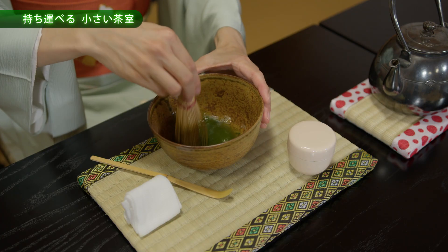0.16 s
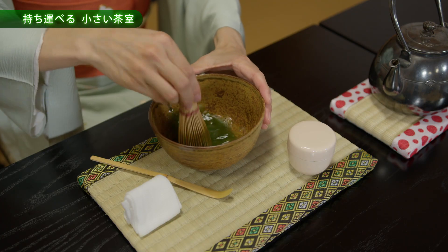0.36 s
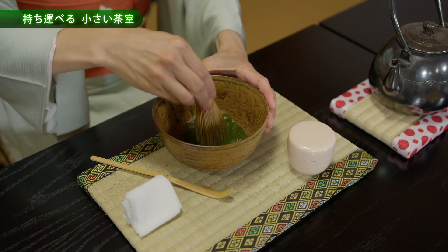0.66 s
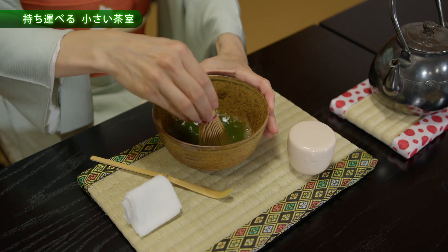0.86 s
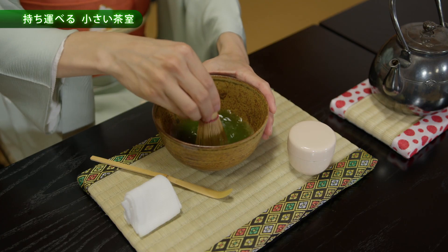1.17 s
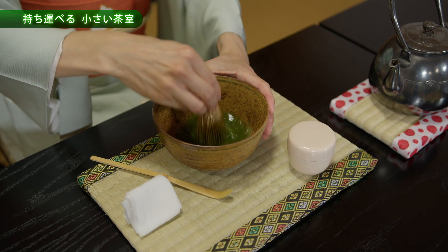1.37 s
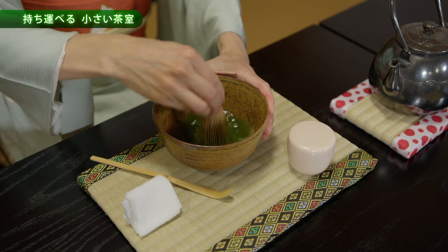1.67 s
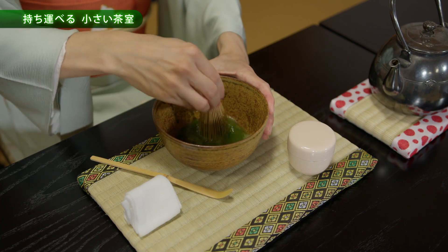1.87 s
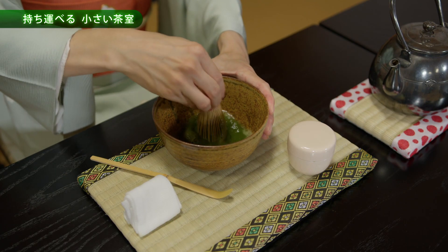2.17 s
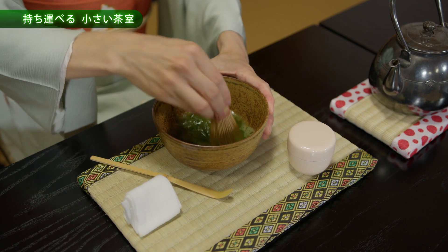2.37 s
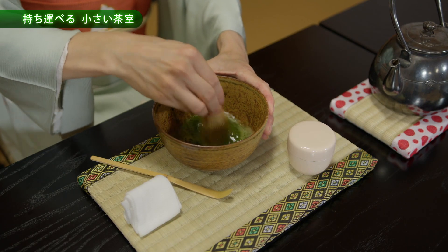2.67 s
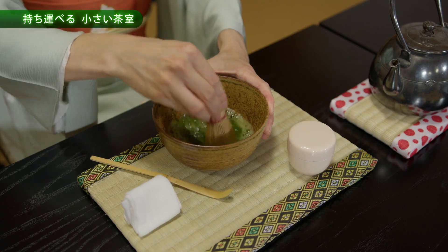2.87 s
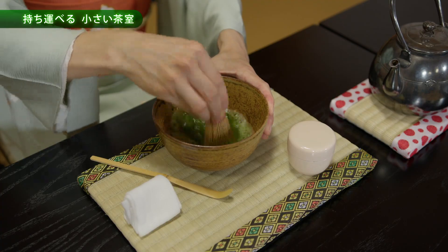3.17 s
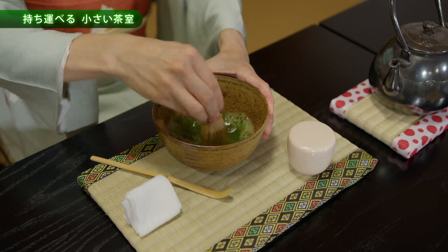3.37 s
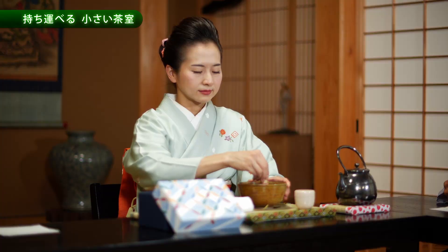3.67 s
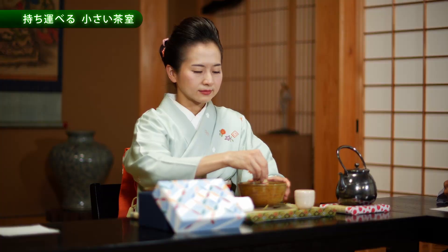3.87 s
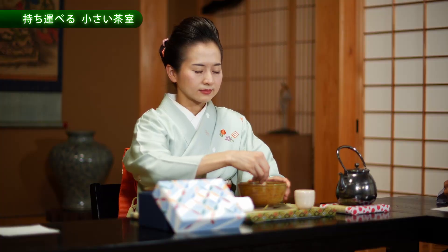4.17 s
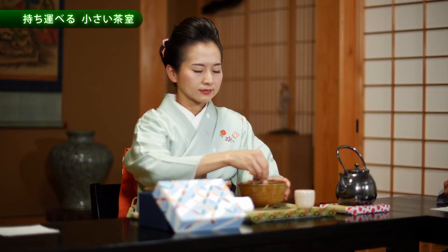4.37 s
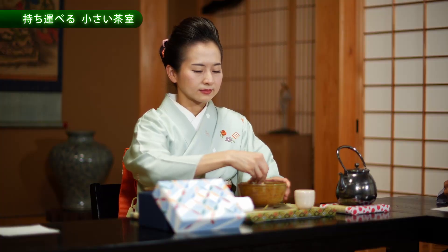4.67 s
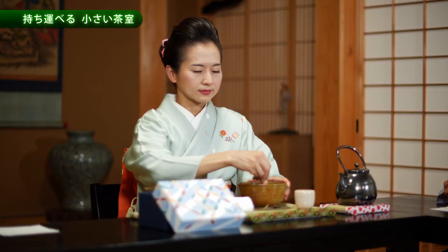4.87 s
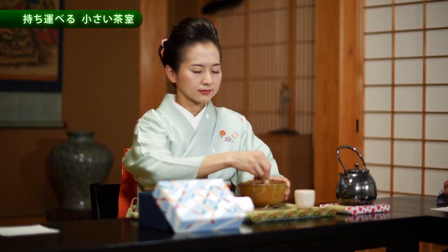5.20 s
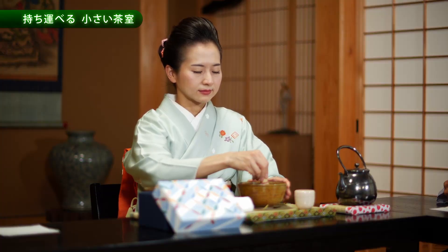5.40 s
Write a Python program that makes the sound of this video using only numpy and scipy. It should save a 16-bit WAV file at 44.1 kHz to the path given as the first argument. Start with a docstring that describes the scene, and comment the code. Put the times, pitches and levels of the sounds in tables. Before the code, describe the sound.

Near microphone, soft short indoor echo, faint air and hum. Thin bamboo tines rub and scratch a glazed bowl in quick regular strokes, each with a small splash and fine bubbles. The bowl taps its mat near the start; strokes are strongest around one second, then settle into even, frothy whisking with tiny squeaks, pops and faint table thuds.

```python
"""Close by a ceramic bowl of tea in a small quiet room: soft air with a faint hum, froth fizzing, a whisk rubbing.
About six strokes a second: a wave of fine bubbles, a scratch that rings the glaze, a splash, a soft swing back.
Early on the bowl knocks and scuffs on its mat and the table thuds, as it will now and then; bubbles pop, tea gulps.
Then come brief narrow tones, tines squeaking and bubbles sinking in pitch; some tines snap free, and near 0.8 s
the whisk sinks in. Bubbles are sine rings or ringing clicks, tines filtered random clicks, the bowl decaying modes."""
import sys
import numpy as np
from scipy import signal
from scipy.fft import rfft, irfft, next_fast_len
from scipy.io import wavfile
from scipy.ndimage import uniform_filter1d, map_coordinates

SR = 44100
rng = np.random.default_rng(int(sys.argv[2]) if len(sys.argv) > 2 else 0)


def digitize_waveform(pressure):
    """Quantize a signal to 16-bit integers and store it at the path in sys.argv[1].

    Rows of a 2-D input are taken as channels; values are limited to [-1, 1].
    """
    field = np.atleast_2d(pressure).T
    bounded = np.clip(field, -1, 1)
    quanta = np.round(bounded * 32767).astype(np.int16)
    wavfile.write(sys.argv[1], SR, quanta)


N = 244314
T = np.arange(N) / SR

# Strokes of the whisk over the glaze. All levels are relative, before the mix.
# Each row: time in seconds, scratch level in dB, scratch length in seconds, hiss of the tips in dB,
# push on the bowl in dB, wave ahead in dB, its pitch in Hz, splash in dB, its pitch in Hz, swing back in dB.
STROKES = [(.098, -50.5, 0.0547, -59.5, -53.5, -62, 2665, -48, 2754, -64),
           (0.182, -51, 0.075, -73.5, -61.5, -71, 2890, -47, 2792, -65),
           (0.261, -49, 0.089, -71.5, -51.5, -75, 2950, -43, 1885, -60.5),
           (0.418, -51, 0.072, -54, -40.5, -53.5, 1616, -52, 2495, -54),
           (0.574, -47.5, .045, -59, -46.5, -48, 2593, -47.5, 2415, -49.5),
           (0.74, -40.5, 0.0663, -56.5, -41, -42, 2691, -46, 2310, -50.5),
           (0.898, -42, 0.0533, -59.5, -48, -59, 2303, -40, 2643, -52.5),
           (1.034, -42, 0.0304, -52.5, -63.5, -48, 2627, -61, 2378, -55),
           (1.187, -44.5, 0.08, -57.5, -65, -47.5, 2955, -43.5, 2574, -49.5),
           (1.303, -46, 0.0462, -64.5, -47, -53, 3120, -44.5, 2386, -61.5),
           (1.369, -47, 0.066, -59, -47, -50, 2319, -47, 2996, -53.5),
           (1.52, -50.5, 0.0553, -57.5, -53, -52.5, 2533, -69.5, 2265, -56),
           (1.661, -57, 0.0725, -61, -51, -54.5, 2016, -49, 2082, -57),
           (1.835, -57, 0.06, -64.5, -50.5, -57, 2601, -55, 2133, -54),
           (1.993, -51.5, 0.048, -70.5, -45.5, -47.5, 2706, -56, 2448, -63.5),
           (2.162, -53.5, 0.056, -77.5, -56, -46.5, 2389, -57.5, 2135, -69.5),
           (2.317, -54, 0.063, -63.5, -61, -60.5, 2337, -53, 2176, -78),
           (2.498, -49, 0.0675, -62, -57, -57.5, 2422, -47.5, 2457, -64.5),
           (2.584, -57.5, 0.0426, -66, -43.5, -52, 3254, -46.5, 2647, -60),
           (2.848, -54.5, 0.0684, -62, -60, -61, 2145, -56, 2325, -58.5),
           (3.006, -50.5, 0.0665, -60, -65.5, -55.5, 2195, -47, 2028, -55),
           (3.166, -51.5, 0.0542, -66, -51, -50, 2172, -51.5, 2001, -64.5),
           (3.315, -49, 0.077, -65.5, -47, -54, 2324, -56, 2230, -59),
           (3.487, -56.5, 0.065, -62, -60, -49.5, 2586, -54.5, 2260, -53),
           (3.654, -55.5, 0.052, -69, -45.5, -45, 2664, -49.5, 2396, -61.5),
           (3.831, -55, 0.0503, -69, -62.5, -56.5, 2520, -56, 2060, -69),
           (3.999, -57.5, 0.0675, -65.5, -52.5, -57.5, 3680, -54, 2239, -62.5),
           (4.175, -50.5, 0.0654, -57.5, -53.5, -56, 2798, -44, 2027, -54.5),
           (4.35, -51.5, 0.075, -61, -61.5, -42.5, 2386, -53, 2461, -58.5),
           (4.525, -57.5, 0.0453, -72, -51.5, -54, 2590, -57.5, 2143, -61),
           (4.69, -49, 0.0636, -57.5, -48, -61.5, 2325, -47.5, 2010, -64.5),
           (4.857, -59, 0.0383, -65, -48, -57, 2585, -51.5, 2046, -64.5),
           (5.039, -54.5, 0.0366, -56, -48.5, -58.5, 2323, -50, 2134, -57.5),
           (5.207, -52, 0.0567, -64.5, -48.5, -54, 2359, -49.5, 2121, -59),
           (5.355, -56.5, 0.09, -62.5, -51.5, -52.5, 2534, -57, 2397, -78),
           (5.53, -54.5, 0.034, -67, -50.5, -51.5, 2387, -53, 2483, -62)]
# The bowl meeting its mat. Each row: start in seconds, relative level in dB, contact time in seconds.
KNOCKS = [(0.1504, -42, 0.00063), (.161, -33.5, 0.0001), (0.173, -54.5, 0.00064)]


def undb(db):
    """Decibels to gain."""
    return 10 ** (np.asarray(db) / 20)


def unit(x):
    """Scale to rms 1."""
    return x / np.sqrt(np.mean(x ** 2) + 1e-18)


def decay(t, t60_s):
    """Exponential decay that has lost 60 dB after t60_s."""
    return np.exp(-np.log(1000) * t / t60_s)


def cut(x, order, edges_hz, kind="high"):
    """Butterworth filter, forward in time."""
    return signal.sosfilt(signal.butter(order, edges_hz, kind, fs=SR, output="sos"), x)


def add(track, s, sound):
    """Mix a sound into the track from time s on."""
    start = int(s * SR)
    first, last = max(start, 0), min(start + len(sound), len(track))
    if last > first:
        track[first:last] += sound[first - start:last - start]


def colour(x, points):
    """Filter by a (Hz, dB) spectrum, keeping the power of a white input."""
    hz, db = np.transpose(points)
    size = 2 * next_fast_len(N // 2 + SR // 2)
    f = np.maximum(np.fft.rfftfreq(size, 1 / SR), 1)
    gain = unit(undb(np.interp(np.log(f), np.log(hz), db)))
    return irfft(rfft(x, size) * gain)[:N]


def swell(t, length, skew=0):
    """Bell round t = 0, as wide as the length at half height; positive skew shortens the rise."""
    width = length * (1 + np.clip(skew, -.8, .8) * np.sign(t))
    return .5 ** ((2 * t / width) ** 2)


def burst(x, length, skew=0):
    """Shape a sound into one swell round its middle, about rms 1 at the top."""
    t = T[:len(x)]
    shape = swell(t - t.mean(), length, skew)
    return unit(x * shape) * np.sqrt(np.mean(shape ** 2))


def echoes(x, t60_s, wet_db, soft_hz):
    """The sound plus a dense, random, decaying tail of itself, dull above a corner."""
    t = T[:SR // 2]
    tail = rng.standard_normal(len(t)) * decay(t, t60_s)
    tail = cut(tail / np.linalg.norm(tail), 1, min(soft_hz, SR / 3), "low")
    return x + undb(wet_db) * signal.fftconvolve(x, tail)[:len(x)]


def ringing(modes):
    """Response of (Hz, dB, t60 s) modes to one click: a sum of decaying sines."""
    t = T[:SR // 2]
    return sum(undb(db) * np.sin(2 * np.pi * hz * t) * decay(t, t60) for hz, db, t60 in modes)


def room():
    """The room's air is coloured noise; a steady sine hums faintly under it."""
    # Spectrum of the air. Each row: frequency in Hz, level in dB.
    air_colour = [(20, -58), (28, -45.5), (40, -16), (58, -9), (110, -2.5), (170, -1.5), (280, -6.5),
                  (420, -4), (620, -7), (1500, -9.5), (5000, -9), (15000, -17.5)]
    air_db, hum_hz, hum_db = -64, 118.5, -81.5
    air = undb(air_db) * colour(rng.standard_normal(N), air_colour)
    return air + undb(hum_db) * unit(np.sin(2 * np.pi * hum_hz * T))


def stirring():
    """Gain of the rub and the froth: it follows the pressure and dips as the whisk turns at the wall."""
    # How hard the whisk is pressed. Each row: time in seconds, relative level of the rubbing in dB.
    pressure = [(0, -50.5), (.35, -55.5), (.66, -44.5), (.8, -42.5), (1.25, -44), (1.5, -52.5), (2.6, -49),
                (2.77, -56), (3.1, -52.5), (3.6, -51.5), (5.15, -50), (5.45, -52.5)]
    turn_lag_s, turn_dip_db, turn_s = 0.0614, -2.5, 0.062
    turning = sum(swell(T - s - turn_lag_s, turn_s) for s, *_ in STROKES)
    return undb(np.interp(T, *np.transpose(pressure)) + turn_dip_db * turning)


def slips(size, per_s=5200, scatter_db=1.0, chatter_db=1.5):
    """Stick-slip clicks of dozens of tines; neighbours catch together for a few milliseconds."""
    clicks = (rng.random(size) < per_s / SR) * rng.choice([-1, 1], size)
    together = unit(uniform_filter1d(rng.standard_normal(size), size=260))
    scatter = np.clip(rng.standard_normal(size), -2, 2)
    return unit(clicks * undb(scatter_db * scatter + chatter_db * together))


def skim(rub):
    """At first the whisk only skims the tea; the body of the rub comes in as it sinks."""
    skim_hz = 2000  # lower edge while skimming
    middle_s, sinking_s = 0.789, 0.079  # midpoint and length of the sinking
    edge = signal.butter(6, skim_hz, "high", fs=SR, output="sos")
    thin = signal.sosfiltfilt(edge, rub)
    return thin + (rub - thin) * np.clip(.5 + (T - middle_s) / sinking_s, 0, 1)


def scrape(db, length):
    """One sweep of the tines over the glaze: slips with a brief random ring, drawn anew each time."""
    return undb(db) * burst(echoes(slips(SR // 2), t60_s=0.0164, wet_db=-4, soft_hz=8900), length)


def brighten(x, shelf_db, corner_hz=4200):
    """Lift the treble against the body: tines above the tea sound brighter than drowned ones."""
    f = np.maximum(np.fft.rfftfreq(len(x), 1 / SR), 1)
    tilt = np.tanh(2 * np.log(f / corner_hz))
    return irfft(rfft(x) * undb(shelf_db * tilt), len(x))


def snaps():
    """Bent tines snap free on the hardest strokes: very short bursts of noise."""
    # Each row: time in seconds, relative level in dB.
    snap_rows = [(0.7239, -36.5), (0.727, -34), (.738, -41), (0.747, -31.5), (0.895, -44.5), (.902, -45.5),
                 (1.05, -39.5)]
    out, t = np.zeros(N), T[:SR // 2]
    for s, db in snap_rows:
        noise = rng.standard_normal(len(t))
        add(out, s - t.mean(), undb(db) * burst(noise, length=0.00273, skew=0.27))
    return out


def bowl(push, lowest_hz=750):
    """The bowl rings under the tines, too small to give off bass; the swinging tea bends its pitch."""
    # Modes, damped by the tea and the hand.
    # Each row: frequency in Hz, level in dB before levelling by decay time, time to fall 60 dB in seconds.
    bowl_modes = [(1130, -12.5, 0.22), (1302.5, -1.5, 0.232), (1521.7, 1.5, 0.15), (2131.6, 6, 0.082),
                  (2260, 5.5, 0.084), (2697, -4, 0.063), (3282, 2.5, 0.061), (3848, 3, 0.083),
                  (3884, 7.5, 0.1), (5069, 6.5, 0.036)]
    detune, swings_per_s = 0.00956, 2.7  # largest pitch bend as a share
    ring = ringing([(hz, db - 10 * np.log10(t60), t60) for hz, db, t60 in bowl_modes])
    ring = cut(ring, 4, lowest_hz)
    out = signal.fftconvolve(push, ring / np.linalg.norm(ring))[:N]
    swing = 2 * np.pi * swings_per_s
    bent_time = T + detune / swing * np.sin(swing * T)
    return map_coordinates(out, [bent_time * SR], mode="nearest")


def whisk(bowl_db=-3.5, rub_push_db=-14):
    """Tines rub throughout, scratch on each stroke and softly on the way back; they also ring the bowl."""
    # Colour of tines rubbing under the tea. Each row: frequency in Hz, level in dB.
    rub_colour = [(20, -70), (300, -22.5), (720, -35), (950, -12), (1300, -7), (1800, -2.5), (2200, -2.5),
                  (3200, 1), (4400, -5.5), (5200, -4), (8300, -11.5), (15500, -31)]
    # Colour of a tine slipping on the glaze. Each row: frequency in Hz, level in dB.
    tine_colour = [(20, -70), (300, -106), (720, -37.5), (920, -4.5), (1750, -4.5), (2150, -6.5),
                   (3300, 1.5), (4400, 1), (5200, 2), (6100, -4.5), (7200, -6.5), (8700, -13), (12000, -22),
                   (15500, -32.5)]
    # Colour of the hissing tine tips. Each row: frequency in Hz, level in dB.
    tip_colour = [(20, -76.5), (4000, -33.5), (8000, 1.5), (9700, 0.5), (12000, -8), (15500, -12.5)]
    # the tips hiss before the whole whisk bears on the glaze, for a share of the stroke's length
    tips_lead_s, tips_share = .01, 0.853
    return_lag_s, return_s = 0.088, 0.067
    # a light stroke stays above the tea and is bright; a hard one goes deep and is duller
    neutral_db, dulling_db_per_db = -37, 0.3619

    rub = slips(N) * stirring()
    scratch, tips, push = snaps(), np.zeros(N), rub * undb(rub_push_db)
    t = T[:SR // 2]
    for s, db, length, tips_db, push_db, *_, return_db in STROKES:
        start = s - t.mean()
        stroke = scrape(db, length)
        crisp = slips(len(t), per_s=4100, scatter_db=0.5, chatter_db=2.5)
        hiss = burst(crisp, tips_share * length, skew=0.23)
        add(tips, start - tips_lead_s, undb(tips_db) * hiss)
        add(scratch, start, brighten(stroke, dulling_db_per_db * (neutral_db - db)))
        add(scratch, start + return_lag_s, brighten(scrape(return_db, return_s), shelf_db=2.5))
        add(push, start, stroke * undb(push_db - db))
    rubbing = undb(-3.0) * skim(colour(rub, rub_colour))
    scratching = undb(1.0) * colour(scratch, tine_colour)
    return rubbing + scratching + colour(tips, tip_colour) + undb(bowl_db) * bowl(push)


def bubble(hz, cycles, glide, rise_cycles):
    """A bubble starts up, rings for some cycles (to -60 dB) and rises in pitch as it nears the surface."""
    turn = np.arange(int(cycles / hz * SR)) * hz / SR
    age = turn / cycles
    shape = decay(age, 1) * (1 - np.exp(-(turn / rise_cycles) ** 2))
    return np.sin(2 * np.pi * turn * (1 + glide * age)) * shape / shape.max()


def fizz(length, hz, count, spread, cycles, sink=0, scatter_db=4.0, edge=.8):
    """A dense run of bubbles of about one size, rms 1; the pitch sinks by a share as they merge and grow."""
    out = np.zeros(int(length * SR))
    draws = np.clip(rng.standard_normal((count, 3)), -2, 2)
    for k, (late, pitch, loud) in enumerate(draws):
        place = (k + late) / count % 1
        bubble_hz = hz * np.exp(spread * pitch - sink * (place - .5))
        ring = bubble(bubble_hz, cycles, glide=0.0533, rise_cycles=0.533)
        add(out, place * length, undb(scatter_db * loud) * ring)
    # the gaps between the tines limit the bubble size, so little sounds below the cloud's pitch
    return unit(cut(out, 6, edge * hz))


def sloshes():
    """Bubble clouds as (s, dB, length s, Hz): wave, splash and gurgle of each stroke, then the deep gulps."""
    # Gulps where the whisk drags air under.
    # Each row: time in seconds, relative level in dB, bubble pitch in Hz.
    gulp_rows = [(0.276, -50, 1091), (0.901, -47.5, 1316), (1.322, -47.5, 1204), (1.637, -50.5, 1389),
                 (3.115, -48.5, 1446), (3.322, -50, 1100), (3.411, -56, 1190), (3.64, -49, 1146),
                 (3.852, -54.5, 1188), (2.016, -58, 1200), (2.346, -61.5, 1120), (4.02, -56, 1535),
                 (4.634, -49.5, 1295), (4.814, -54.5, 1376), (5.315, -56, 1249), (5.383, -56, 1076),
                 (5.475, -60, 1047)]
    gulp_s = 0.05
    wave_lead_s, wave_s = 0.051, .045
    splash_lag_s, splash_s = .01, .055
    gurgle_db, gurgle_hz = -13, 1293.4  # level against the push on the bowl
    for s, _, _, _, push_db, wave_db, wave_hz, splash_db, splash_hz, _ in STROKES:
        yield s - wave_lead_s, wave_db, wave_s, wave_hz
        yield s + splash_lag_s, splash_db, splash_s, splash_hz
        yield s + splash_lag_s, push_db + gurgle_db, gulp_s, gurgle_hz
    for s, db, hz in gulp_rows:
        yield s, db, gulp_s, hz


def pop(hz):
    """A big bubble bursts: its skin cracks in a short noise close round its pitch, and the hollow rings."""
    crack_db, crack_t60_s = -2, 0.0217  # level against the ring
    t = T[:SR // 20]
    noise = rng.standard_normal(len(t)) * decay(t, crack_t60_s)
    crack = cut(noise, 2, [hz * 0.882, hz * 1.232], "band")
    out = undb(crack_db) * crack / np.abs(crack).max()
    add(out, 0, bubble(hz, cycles=15.65, glide=0.0081, rise_cycles=2.45))
    return out


def tea():
    """Froth fizzes all along; each slosh folds in a cloud of bubbles; a few big ones burst on their own."""
    # Single large bubbles bursting.
    # Each row: start in seconds, level in dB before the trim below, pitch in Hz.
    pop_rows = [(.199, -29, 1154), (0.212, -39, 1050), (.269, -25.5, 2157), (.283, -24, 2112),
                (.396, -21.5, 2310), (0.495, -19.5, 2510), (.509, -30, 2710), (.581, -22, 2434),
                (.897, -28.5, 1009), (.983, -33, 1007), (1.311, -29.5, 1064), (1.329, -26, 1245),
                (1.616, -28.5, 2000), (1.63, -32, 2480), (2.091, -28, 2320), (2.122, -26, 2720),
                (2.148, -22, 2254), (2.421, -31, 2450), (2.466, -23, 2940), (2.574, -33, 3110),
                (3.102, -34, 1426), (3.263, -25.5, 2320), (3.314, -31, 1099), (3.398, -25, 2360),
                (3.414, -31, 2700), (3.423, -28.5, 2370), (3.582, -27, 2376), (3.587, -39, 1078),
                (3.63, -25.5, 1077), (3.937, -32.5, 3560), (3.971, -33.5, 3600), (4.16, -26.5, 1930),
                (4.176, -30.5, 2070), (4.277, -27, 2350), (4.286, -22, 2870), (4.413, -37, 2310),
                (4.427, -35, 2300), (4.454, -26.5, 2470), (4.797, -33, 1207), (4.968, -28.5, 2324),
                (5.052, -23, 1995), (5.065, -26.5, 2076), (5.135, -29.5, 2480), (5.305, -28.5, 2690)]
    froth_db, pop_trim_db = -7, -8.5
    # the bigger and lower the bubbles of a cloud, the fewer: count at a reference pitch
    cloud_count, cloud_hz = 46, 2400
    froth = fizz(N / SR, 2209.9, count=4000, spread=0.109, cycles=44.3, edge=1.0)
    out = undb(froth_db) * stirring() * np.resize(froth, N)
    for s, db, length, hz in sloshes():
        cloud = fizz(2 * length, hz, count=int(cloud_count * hz / cloud_hz), spread=0.0848,
                     cycles=19.4, sink=0.1294, scatter_db=0.5, edge=0.765)
        add(out, s - length, undb(db) * burst(cloud, length, skew=0.058))
    for s, db, hz in pop_rows:
        add(out, s, undb(db + pop_trim_db) * pop(hz))
    return out


def knocks():
    """The bowl's foot meets the mat; a longer contact gives a duller knock."""
    # What bowl and table ring with.
    # Each row: frequency in Hz, level in dB, time to fall 60 dB in seconds.
    knock_modes = [(131, -14, 0.147), (482, -4.5, 0.113), (761, 1, 0.0376), (1088, 4, 0.021),
                   (1500, 3, 0.0225)]
    out = np.zeros(N)
    for s, db, contact_s in KNOCKS:
        contact = swell(T[:SR // 200] - 2 * contact_s, contact_s)
        knock = np.convolve(contact, ringing(knock_modes))
        add(out, s, undb(db) * knock / np.abs(knock).max())
    return out


def table():
    """The bowl knocks, then its foot scuffs over the straw to rest; the table thuds under working hands."""
    # Colour of the scuff. Each row: frequency in Hz, level in dB.
    scuff_colour = [(20, -40), (60, -22), (110, -12.5), (190, -21), (300, 0), (430, 10.5), (700, -3),
                    (1000, 2), (1500, 8), (3000, -33.5)]
    # Soft thuds of the table. Each row: time in seconds, relative level in dB.
    thud_rows = [(.16, -61.5), (.63, -72.5), (2.134, -70.5), (4.363, -73), (4.975, -71.5), (5.38, -75.5),
                 (5.524, -68)]
    # Colour of a thud. Each row: frequency in Hz, level in dB.
    thud_colour = [(20, -55), (50, -22), (75, 7), (120, 11), (200, -1.5), (320, -43), (1000, -60.5)]
    scuff_db, scuff_t60_s, thud_s = -50.5, 0.567, 0.141
    age = np.maximum(T - KNOCKS[0][0], 0)
    scuff_gain = undb(scuff_db) * decay(age, scuff_t60_s) * (age > 0)
    scuff = scuff_gain * colour(rng.standard_normal(N), scuff_colour)
    thud_gain = sum(undb(db) * swell(T - s, thud_s) for s, db in thud_rows)
    return knocks() + scuff + thud_gain * colour(rng.standard_normal(N), thud_colour)


def narrow_tones():
    """Brief narrow tones, clicks ringing one mode: tines squeak steadily, and bubbles sink in pitch."""
    # Each row: time in seconds, relative level in dB, length in seconds, pitch in Hz,
    # fall of pitch in shares per second (0 for a steady squeak).
    tone_rows = [(0.427, -46.5, 0.0355, 3900, 0), (0.429, -52, 0.062, 2394, 0.36),
                 (.555, -47, 0.104, 2430, 1.5), (0.708, -51, 0.061, 2188, 1.43),
                 (.8, -45.5, 0.058, 3860, 0.077), (1.525, -50, 0.046, 5096, 0.31),
                 (1.685, -46.5, 0.0438, 3908, 0), (1.839, -52, 0.047, 4826, 0.16),
                 (1.843, -55.5, 0.044, 1318, 0), (2.161, -45.5, 0.0585, 2148, 1.25),
                 (2.505, -45, 0.032, 3756, 0.23), (2.57, -46, 0.059, 3113, 1.6),
                 (3.026, -51, 0.064, 3658, 0.64), (3.322, -52, 0.124, 2284, 0.2),
                 (3.964, -50.5, 0.0446, 3780, 0.41), (4.37, -52, 0.056, 1616, 0.39),
                 (4.98, -51.5, 0.036, 2333, 1.52), (4.684, -50, .039, 7043, 0.75),
                 (5.196, -51.5, .035, 4950, 1.04)]
    ring_t60_s = .035
    out, t = np.zeros(N), T[:SR // 2]
    for s, db, length, hz, fall in tone_rows:
        tone = signal.fftconvolve(slips(len(t)), ringing([(hz, 0, ring_t60_s)]))[:len(t)]
        tone = cut(tone, 2, hz / 2)
        sliding_time = t - fall * (t - t.mean()) ** 2 / 2
        tone = map_coordinates(tone, [sliding_time * SR], mode="nearest")
        add(out, s - t.mean(), undb(db) * burst(tone, length))
    return out


def scene():
    """Whisk, tea and table with the short, soft echoes of mats and paper screens, over air and hum."""
    near = undb(0.5) * whisk() + narrow_tones() + undb(-0.9364) * tea() + table()
    return (echoes(near, t60_s=0.256, wet_db=-6.0, soft_hz=3530) + room())[None]


def record(dry):
    """The recorder cuts the top with a steep low-pass."""
    top_hz = 15750
    return signal.sosfilt(signal.ellip(10, .2, 70, top_hz, fs=SR, output="sos"), dry)


dry = scene()
out = record(dry)
digitize_waveform(out)
```